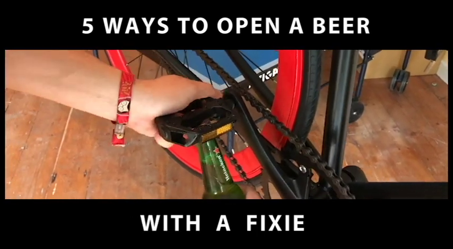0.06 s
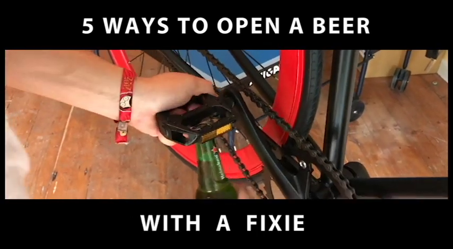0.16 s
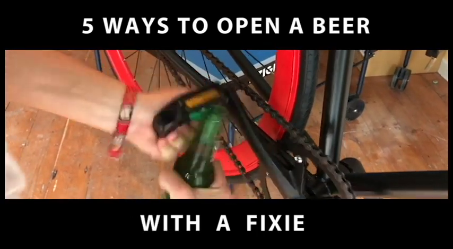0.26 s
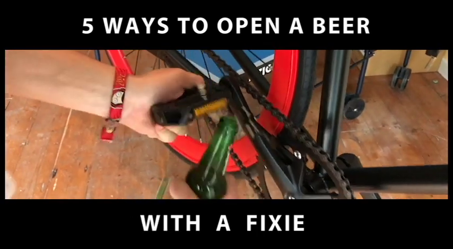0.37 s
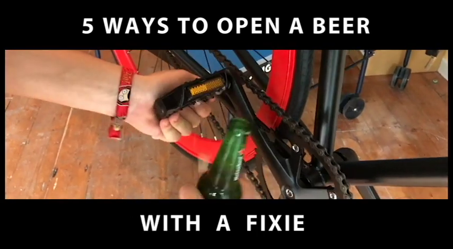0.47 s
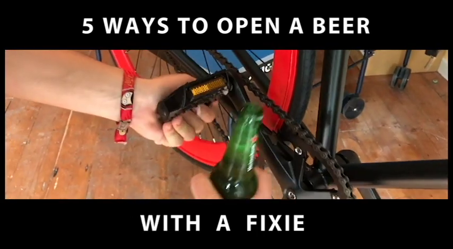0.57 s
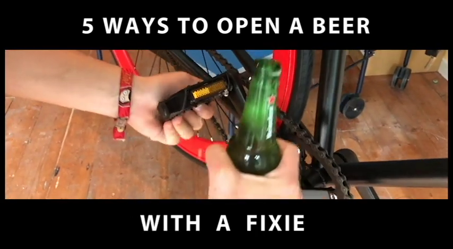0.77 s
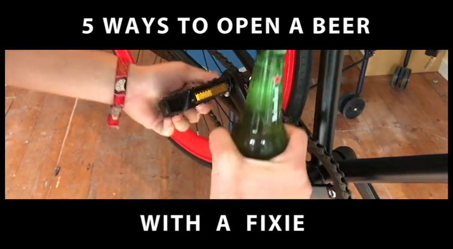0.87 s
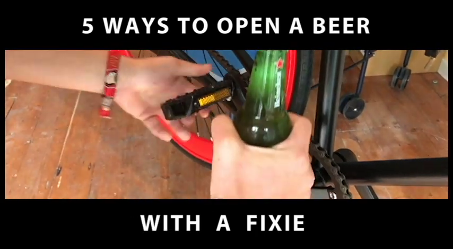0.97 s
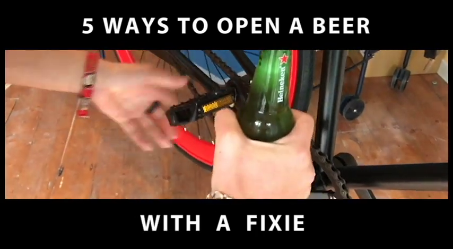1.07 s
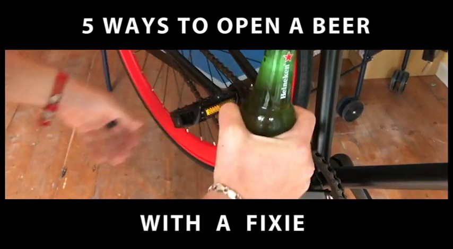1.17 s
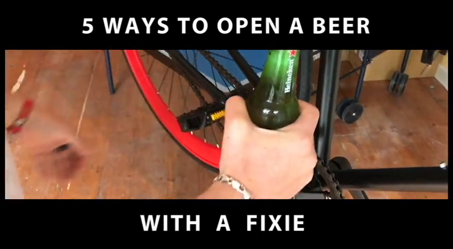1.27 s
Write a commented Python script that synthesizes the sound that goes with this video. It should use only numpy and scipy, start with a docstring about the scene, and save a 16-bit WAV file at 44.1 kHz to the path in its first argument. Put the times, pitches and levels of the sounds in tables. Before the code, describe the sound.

A beer bottle is opened close by. Gas hisses briefly at about 0.2 seconds, then the seal cracks at 0.3 and the cap comes off with a hollow pop and quick metallic scrapes and clinks. The bicycle used as an opener gives a low shudder around 0.5. At 0.8 the cap hits the wooden floor further off, skipping faintly until about 1.3 in a slightly echoing room.

```python
"""A faint creak and a hiss of gas come first: a crown cap is levered off a beer bottle on a bicycle pedal.
The seal cracks, the steel cap scrapes and rings over the pedal, and the air in the neck resonates: a pop.
The jolted bicycle shudders; further off the cap knocks on the wooden floor and skips away.
The bare room answers with a diffuse reverberation whose treble dies first."""
import sys
import numpy as np
from scipy import signal
from scipy.fft import rfft, irfft, next_fast_len
from scipy.io import wavfile

SR = 44100
rng = np.random.default_rng(int(sys.argv[2]) if len(sys.argv) > 2 else 0)


def digitize_waveform(pressure):
    """Quantize a signal to 16-bit integers and store it at the path in sys.argv[1].

    Rows of a 2-D input are taken as channels; values are limited to [-1, 1].
    """
    field = np.atleast_2d(pressure).T
    bounded = np.clip(field, -1, 1)
    quanta = np.round(bounded * 32767).astype(np.int16)
    wavfile.write(sys.argv[1], SR, quanta)


N = 57330
T = np.arange(N) / SR

# modes of the steel cap: f/Hz, level/dB, T60/s
CAP_MODES = [(3310, -14.5, 0.11), (4045, -16.5, 0.16), (4190, -12, 0.077), (4688, -4.5, 0.049),
             (4910, -0.5, 0.057), (4941, -6.5, 0.063), (8430, -4, 0.043), (8720, -11, 0.097),
             (13200, -7.5, .045), (13750, -8.5, .045), (14470, -9.5, .04), (15700, -11.5, .03),
             (15550, -10.5, .03)]
# the rim gives under the lever: t/s, level/dB
RIM_CREAKS = [(.096, -57.5), (.199, -48)]
# the cracking seal: f/Hz, level/dB
CRACK_SPECTRUM = [(100, -19.5), (400, -7), (950, 5), (1500, -5.5), (2300, 2), (2800, -12.5), (3350, 8),
                  (4000, -10.5), (5000, -1.5), (6800, -21.5), (8400, -8), (11000, -20), (13500, -11.5),
                  (15700, -14)]
# the cap slips on pedal and glass: t/s, ring/dB, tilt/(dB per octave), scrape/dB
CAP_SLIPS = [(.2968, -31, -0.5, -25.5), (.3272, -16, -4.5, -30.5), (.3337, -15, -2, -27.5),
             (0.3371, -23.5, -3.5, -14), (0.3414, -19, 6.5, -13), (0.3475, -18.5, 3.5, -18.5),
             (.3706, -14.5, 4, -17.5), (0.3737, -17, 2, -16), (.3792, -11, -2, -15.5),
             (.383, -23, 3.5, -16), (.3865, -29, 1, -14.5), (0.3952, -30.5, 0, -21)]
# steel scraping on pedal and glass: f/Hz, level/dB
SCRAPE_SPECTRUM = [(80, -18), (300, -5.5), (600, -4), (1200, -10), (2000, 2.5), (2700, -5.5), (4000, 1.5),
                   (6000, 3.5), (8500, -3.5), (11000, -3), (13500, -7), (15700, -3)]
# the cap rings on in flight: t/s, level/dB, T60/s
FLIGHT_RINGS = [(.385, -46, .5)]
# a light touch of the rim: f/Hz, level/dB
TICK_SPECTRUM = [(500, -27), (2000, -9.5), (4500, -4), (6500, 5.5), (8000, -5), (12000, -5.5),
                 (15500, -8.5)]
# air resonance in the neck: t/s, level/dB, first f/Hz, last f/Hz, T60/s
NECK_POPS = [(.2972, -18, 857, 1038, 0.11), (.3420, -5, 1178, 760, .062)]
# turbulence in the neck: f/Hz, level/dB
NECK_SPECTRUM = [(200, -19), (330, -6), (450, -12), (600, -6.5), (720, -10), (850, 3), (1100, 4), (1300, 5),
                 (1500, -21), (1900, -13), (3000, -18)]
# escaping gas: t/s, level/dB
LEAK_ENVELOPE = [(.155, -91), (.16, -50), (.175, -47.5), (.19, -47), (.2, -39), (.215, -28), (.228, -23),
                 (.25, -25.5), (.263, -40.5), (.28, -47.5), (.296, -42.5), (.31, -92)]
# the gas jet: f/Hz, level/dB
JET_SPECTRUM = [(100, -25), (300, -37), (1100, -25), (2200, -18.5), (3800, -10.5), (5000, -18),
                (6500, -1.5), (7500, -12.5), (9200, 1.5), (10500, -2), (13500, 5), (15700, 1)]
# the cap hits the boards: t/s, knock/dB, ring/dB, clack/dB
FLOOR_IMPACTS = [(0.7801, -27, -29, -25.5), (0.7826, -24, -26, -48), (.792, -27.5, -28.5, -35),
                 (.798, -35, -30, -38), (0.8767, -37.5, -43, -25.5)]
# light skips: t/s, tick/dB, ring/dB
FLOOR_SKIPS = [(.893, -38, -58), (0.931, -45, -62), (0.999, -49.5, -70), (1.2052, -47, -68),
               (1.2201, -41, -60), (1.292, -62, -55)]
# struck floorboards: f/Hz, level/dB
BOARD_SPECTRUM = [(60, 0.5), (150, 2), (300, 2.5), (450, -6), (750, 2), (1150, 3), (1800, -7), (2800, -4.5),
                  (3700, -6.5), (5000, -2.5), (6300, -15), (7700, -27.5), (15000, -28)]
# the rim on wood: f/Hz, level/dB
CLACK_SPECTRUM = [(500, -18), (1800, -6), (2700, -0.5), (4200, 5.5), (5300, -7), (6600, -8), (7700, -21),
                  (9400, -8.5), (10500, -14.5), (12500, -10), (15500, -13)]
# the boards muffle the cap's modes: f/Hz, gain/dB
BOARD_MUFFLING = [(3300, -12), (4700, -8.5), (4950, 1.5), (8400, -21.5), (13000, -10), (13900, -3),
                  (15500, -7)]
# dull jolts of the bicycle: t/s, level/dB, f/Hz
FRAME_JOLTS = [(0.4602, -20, 66), (0.531, -29, 69.5), (0.586, -33, 75)]
# the shuddering frame: t/s, level/dB
FRAME_ENVELOPE = [(.29, -63.5), (.32, -51.5), (.43, -44.5), (.46, -33), (.52, -37.5), (.65, -43), (.8, -46),
                  (.87, -53), (1.3, -64.5)]
# its rumble: f/Hz, level/dB
FRAME_SPECTRUM = [(20, -18), (45, -6.5), (78, 1), (110, -9), (180, -5), (240, -18), (350, -14.5),
                  (480, -30), (1000, -45)]
# the hand lets go: t/s, level/dB
RUB_ENVELOPE = [(1.19, -82), (1.25, -58), (1.3, -56.5)]
# its soft low rub: f/Hz, level/dB
RUB_SPECTRUM = [(60, 0), (200, -10), (370, 4.5), (550, -7.5), (1200, -30)]
# the still room: f/Hz, level/dB
AIR_SPECTRUM = [(20, -10.5), (35, -7), (70, -2), (130, -7.5), (200, -8.5), (320, -4.5), (450, -13.5),
                (750, -19.5), (1200, -17), (3500, -23), (8000, -31), (11000, -26.5), (15500, -34)]
# reverberation time: f/Hz, T60/s
REVERB_TIMES = [(100, 1.3), (400, 1.17), (1100, 1.095), (2500, 0.93), (5000, 0.94), (8500, 0.91),
                (14000, 0.65)]
# reverberant tail: f/Hz, level/dB
REVERB_SPECTRUM = [(100, -8), (350, 0), (600, 4.5), (850, -3), (1200, 3.5), (1600, 0), (3300, 2),
                   (5000, -5.5), (8500, -6.5), (14000, -7)]
# early reflections: delay/s, level/dB
REFLECTIONS = [(.0052, -20), (.0085, -21.5), (0.0128, -15.5), (0.0207, -22.5)]
# the hand shades the room from the cap's treble: f/Hz, gain/dB
HAND_SHADOW = [(500, 1), (2000, 0), (4000, -1), (8000, -1), (13000, -3)]


def prying():
    """Stick-slip friction: the rim creaks, the seal cracks, and each slip rings the cap until it flies."""
    crack = amp(-6) * struck(s=.2966, t60=.019, attack=.0006) * noise(CRACK_SPECTRUM)
    slips = sum(cap_ring(s, db, tilt) + scrape(s, scrape_db) for s, db, tilt, scrape_db in CAP_SLIPS)
    flight = sum(cap_ring(s, db, tilt_db=-2.5, t60=t60) for s, db, t60 in FLIGHT_RINGS)
    creaks = sum(rim_tick(s, db) for s, db in RIM_CREAKS)
    return creaks + crack + slips + flight


def cap_ring(s, db, tilt_db=0, t60=None):
    """Modal superposition: a blow excites the cap's damped modes, a little differently each time."""
    pivot_hz, detune = CAP_MODES[4][0], .0044
    out = np.zeros(N)
    for hz, mode_db, mode_t60 in CAP_MODES:
        scatter_db, tuning = rng.standard_normal(2)
        gain = amp(db + mode_db + tilt_db * np.log2(hz / pivot_hz) + scatter_db)
        phase = 2 * np.pi * hz * (1 + detune * tuning) * (T - s)
        jitter_rad = .91 * wobble(knots_per_s=370)
        out += gain * struck(s, t60 or mode_t60) * np.sin(phase + jitter_rad)
    return out


def scrape(s, db):
    """Sliding friction: a hard snap runs into a short burst of noise."""
    snap = amp(3) * struck(s, t60=.0038)
    slide = amp(-2) * struck(s, t60=.025)
    return amp(db) * (snap + slide) * noise(SCRAPE_SPECTRUM)


def rim_tick(s, db):
    """A brief contact has a broad spectrum: the rim ticks."""
    return amp(db) * struck(s, t60=.0096) * noise(TICK_SPECTRUM)


def neck_pop():
    """Cavity resonance: released air rings in the neck, gliding as it settles; near surfaces reflect it."""
    glide_s, turbulence_db = .0105, -11.5
    out = np.zeros(N)
    for s, db, first_hz, last_hz, t60 in NECK_POPS:
        glide = np.exp(-np.maximum(T - s, 0) / glide_s)
        hz = (last_hz + (first_hz - last_hz) * glide) * (T > s)
        tone = np.sin(2 * np.pi * np.cumsum(hz) / SR)
        turbulence = amp(turbulence_db) * noise(NECK_SPECTRUM)
        out += amp(db) * struck(s, t60, attack=.0006) * (tone + turbulence)
    return out + sum(amp(db) * np.interp(T - delay, T, out) for delay, db in REFLECTIONS)


def gas_hiss():
    """Turbulent jet noise: gas escapes through the gap under the rim."""
    return swell(LEAK_ENVELOPE) * noise(JET_SPECTRUM)


def landing():
    """Impact excitation: each bounce sounds both the boards and the cap, whose ring they muffle."""
    def muffled_ring(s, db):
        return shaped(cap_ring(s, db), BOARD_MUFFLING)

    wet_db = -1.5
    skips = sum(rim_tick(s, tick_db) + muffled_ring(s, ring_db) for s, tick_db, ring_db in FLOOR_SKIPS)
    out = room(skips, wet_db)
    for s, knock_db, ring_db, clack_db in FLOOR_IMPACTS:
        knock = amp(knock_db) * struck(s, t60=.056) * noise(BOARD_SPECTRUM)
        clack = amp(clack_db) * struck(s, t60=.017) * noise(CLACK_SPECTRUM)
        out += room(knock + clack + muffled_ring(s, ring_db), wet_db)  # each spot has its own echo
    return out


def bicycle():
    """Structural vibration: the freed pedal jolts the frame, which rumbles on; the hand slides off."""
    width_s = .0075
    jolts = np.zeros(N)
    for s, db, hz in FRAME_JOLTS:
        pulse = np.exp(-.5 * ((T - s) / width_s) ** 2)
        jolts -= amp(db) * pulse * np.cos(2 * np.pi * hz * (T - s))
    rumble = swell(FRAME_ENVELOPE) * noise(FRAME_SPECTRUM)
    rub = swell(RUB_ENVELOPE) * noise(RUB_SPECTRUM)
    return jolts + rumble + rub


def still_air():
    """Ambient noise: the room's faint, steady floor."""
    return amp(-67.5) * noise(AIR_SPECTRUM)


def room(x, wet_db):
    """Reverberation: direct sound plus a diffuse field that decays exponentially in each band."""
    hz, t, bands = signal.stft(rng.standard_normal(N), SR, nperseg=256)
    t60 = along(REVERB_TIMES, hz)[:, None]
    decay = np.exp(-np.log(1000) * t / t60)
    unit_energy = np.sqrt(2 * np.log(1000) / (t60 * SR))
    colour = amp(along(REVERB_SPECTRUM, hz))[:, None]
    tail = signal.istft(bands * decay * unit_energy * colour, SR, nperseg=256)[1][:N]
    build_up = 1 - np.exp(-T / .0014)
    return x + amp(wet_db) * signal.fftconvolve(x, tail * build_up)[:N]


def amp(db):
    """Decibels to amplitude ratio."""
    return 10 ** (np.asarray(db) / 20)


def along(points, hz):
    """Interpolation of (f/Hz, value) points on a log frequency axis."""
    f, values = np.transpose(points)
    return np.interp(np.log(hz + 1), np.log(f + 1), values)


def filtered(x, response):
    """Linear filtering: the spectrum of x times a frequency response."""
    size = next_fast_len(N + SR // 2)
    hz = np.fft.rfftfreq(size, 1 / SR)
    return irfft(rfft(x, size) * response(hz), size)[:N]


def shaped(x, spectrum):
    """Spectral weighting by (f/Hz, gain/dB) points."""
    return filtered(x, lambda hz: amp(along(spectrum, hz)))


def noise(spectrum):
    """Coloured Gaussian noise of unit rms."""
    x = shaped(rng.standard_normal(N), spectrum)
    return x / np.std(x)


def swell(points):
    """Amplitude envelope through (t/s, level/dB) points."""
    return amp(np.interp(T, *np.transpose(points)))


def struck(s, t60, attack=.00026):
    """Free decay: a fast rise at time s, then a fall of 60 dB in t60 seconds."""
    age = np.maximum(T - s, 0)
    return (1 - np.exp(-age / attack)) * np.exp(-np.log(1000) * age / t60)


def wobble(knots_per_s):
    """Random modulation: straight lines between Gaussian knots."""
    knots = rng.standard_normal(size=2048)
    return np.interp(T * knots_per_s, np.arange(len(knots)), knots)


def scene():
    """Superposition: the bottle is close, the landing further off and so more reverberant."""
    cap = prying()
    cap_echo = shaped(room(cap, wet_db=-6.5) - cap, HAND_SHADOW)
    bottle = cap + cap_echo + room(gas_hiss(), wet_db=-3) + room(neck_pop(), wet_db=-9)
    return (bottle + landing() + bicycle() + still_air())[None]


def record(dry):
    """Saturation rounds off the highest peaks; a steep low-pass limits the bandwidth."""
    ceiling, cutoff_hz = .65, 15800
    soft = dry[0] / (1 + (dry[0] / ceiling) ** 6) ** (1 / 6)
    return filtered(soft, lambda hz: 1 / np.sqrt(1 + (hz / cutoff_hz) ** 400))[None]


dry = scene()
out = record(dry)
digitize_waveform(out)
```